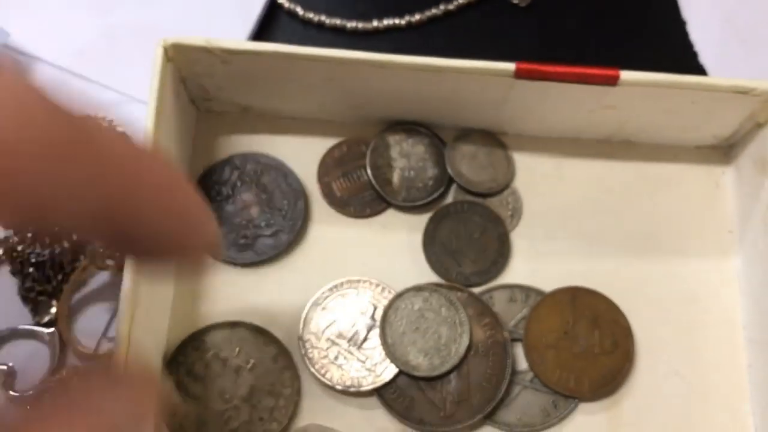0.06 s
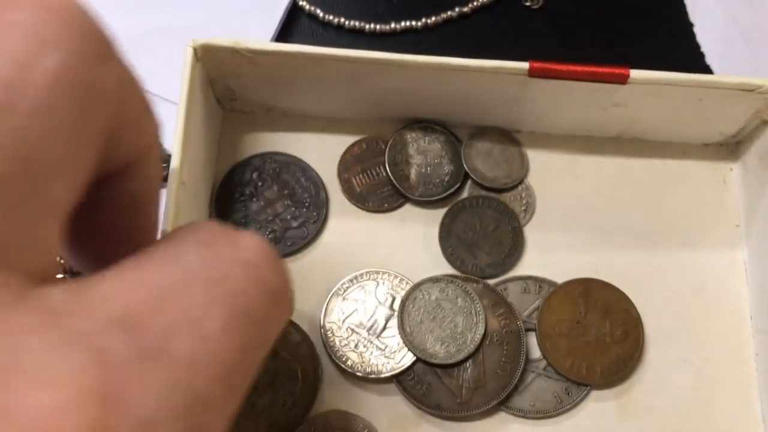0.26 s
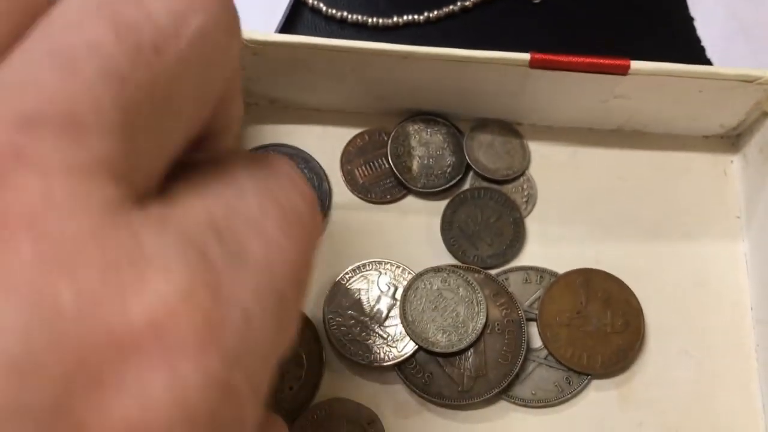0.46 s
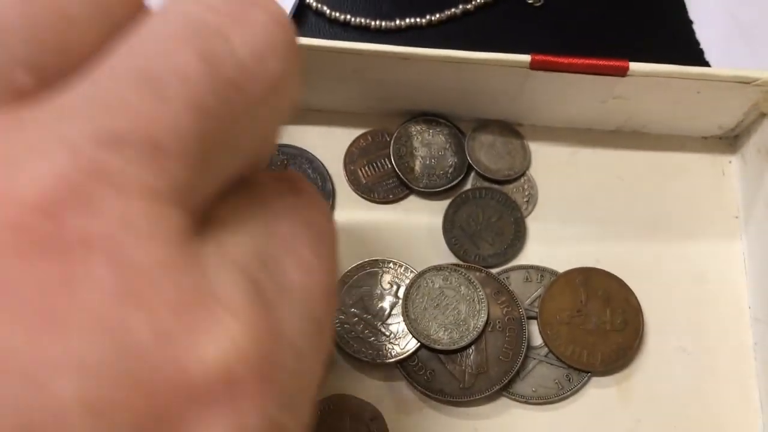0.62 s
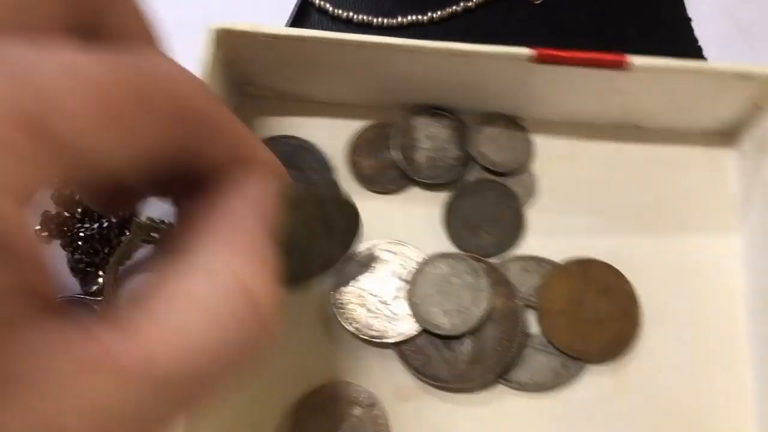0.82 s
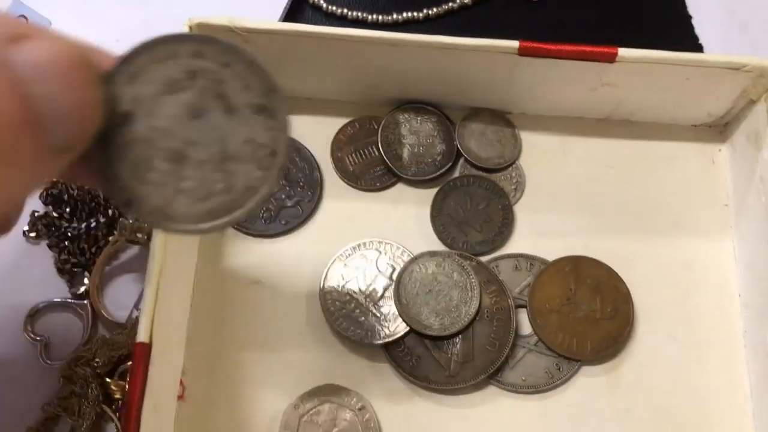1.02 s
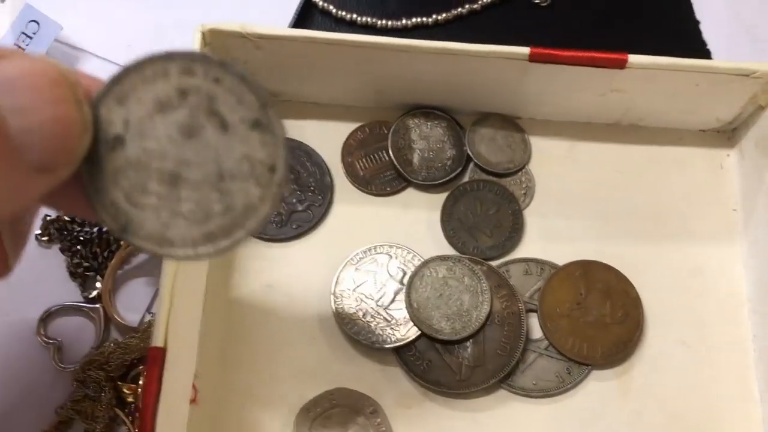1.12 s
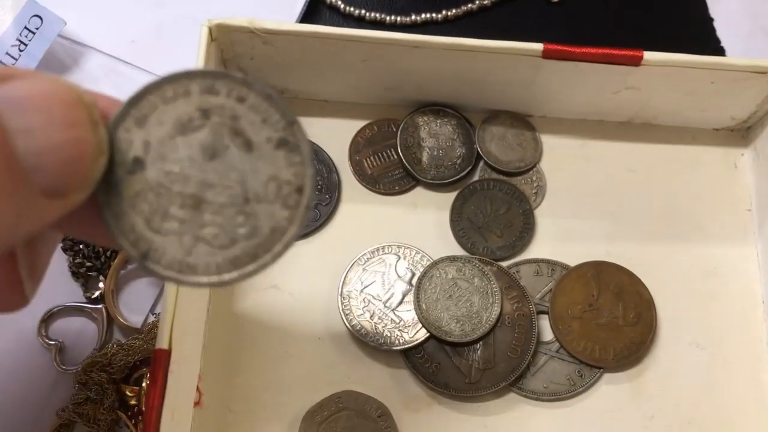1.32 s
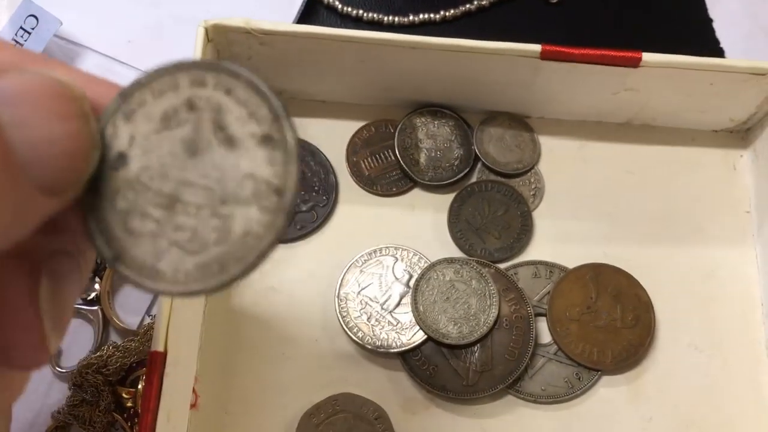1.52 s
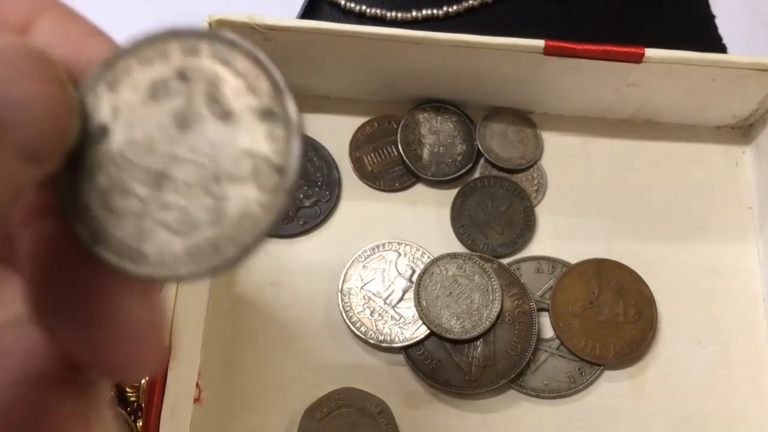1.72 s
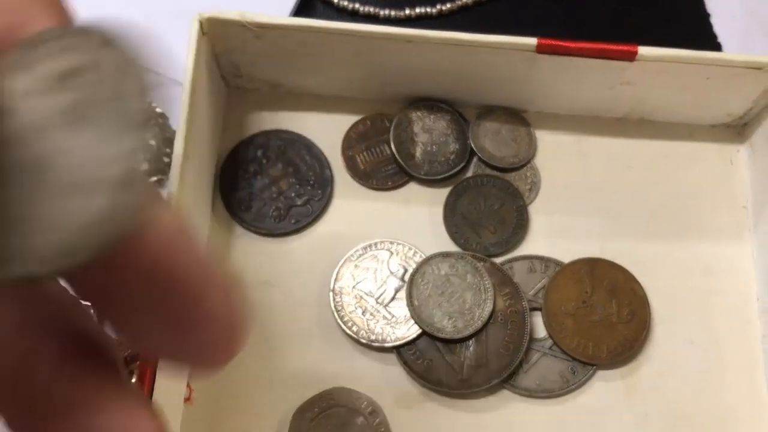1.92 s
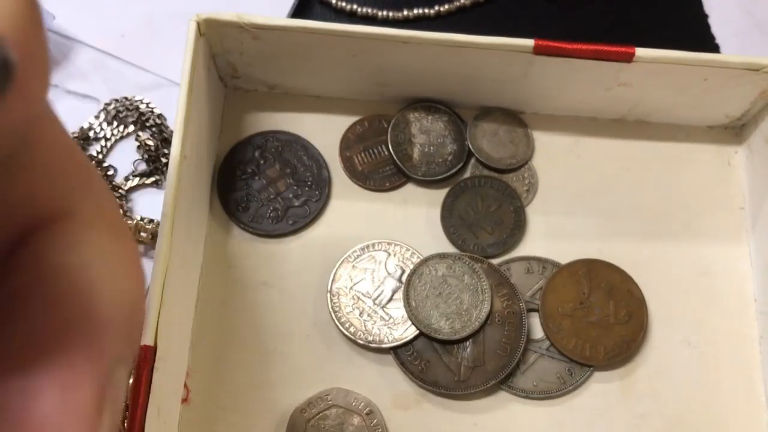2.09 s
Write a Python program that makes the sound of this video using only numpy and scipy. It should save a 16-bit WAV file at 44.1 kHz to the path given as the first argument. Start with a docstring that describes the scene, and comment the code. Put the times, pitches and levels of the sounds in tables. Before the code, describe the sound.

Close up, a coin stutters and scrapes harshly along hollow card, pauses, gives a loud knock with a soft thud and finger rustle, then a few light coin clicks before near silence with low hum.

```python
"""A coin dragged in jerks by a fingertip over the floor of a small cardboard box, close to the microphone:
each jerk shakes noisy catches through the card's resonances and hisses. Contacts are short decaying tones
and noise as the coin bumps the wall and, picked out, clicks against other coins. Low thuds of the box and a
rustle of skin lie beneath. Around it a quiet room: a short dull tail, patchy air, faint mains overtones
and a wavering low hum. The loudest knocks clip."""
import sys
import numpy as np
from scipy import signal
from scipy.fft import rfft, irfft, next_fast_len
from scipy.io import wavfile
from scipy.ndimage import uniform_filter1d

SR = 44100
rng = np.random.default_rng(int(sys.argv[2]) if len(sys.argv) > 2 else 0)


def dump(signal):
    """Clip the signal to [-1, 1] and save it as 16-bit WAV at the path in sys.argv[1]."""
    limited = np.clip(np.atleast_2d(signal).T, -1, 1)
    pcm = np.round(limited * 32767).astype(np.int16)
    wavfile.write(sys.argv[1], SR, pcm)


N = 94947


def amp(db):
    """dB to gain."""
    return 10 ** (np.asarray(db) / 20)


def unit(x):
    """Scaled to rms 1."""
    return x / np.sqrt(np.mean(x ** 2) + 1e-20)


def curves(rows):
    """One value per sample for each column after the time; the first column is silent outside its times."""
    times, first, *rest = np.transpose(rows)
    t = np.arange(N) / SR
    level = np.interp(t, times, first, -120, -120)
    return [level] + [np.interp(t, times, column) for column in rest]


def filtered(x, response):
    """x times a complex response of frequency, padded so that ringing does not wrap round."""
    m = next_fast_len(N + SR // 2)
    return irfft(rfft(x, m) * response(np.fft.rfftfreq(m, 1 / SR)), m)[:N]


def coloured(x, spectrum):
    """x through (frequency, level) points joined on a log axis, rms 1."""
    f, db = np.transpose(spectrum)
    return unit(filtered(x, lambda hz: amp(np.interp(np.log(hz + 1), np.log(f + 1), db, -120))))


def grains(per_s, spread_db):
    """Tiny catches at random times and of uneven size."""
    hit = rng.random(N) < per_s / SR
    size = amp(spread_db * np.minimum(rng.exponential(size=N), 3))
    return unit(hit * rng.standard_normal(N) * size)


# Resonances of the cardboard floor under the coin, before the bass cut:
# (frequency [Hz], width [Hz], level [dB])
CARD_MODES = [(1129, 160, 6), (1358, 134, 6), (1540, 130, 3.5), (2440, 96, 0.5), (2587, 74, -3),
              (3220, 480, -3.5), (4520, 310, -14)]


def card(hz):
    """Resonances of the box floor, alternating in sign; the small panel radiates little bass."""
    modes = 0
    for k, (centre, width, db) in enumerate(CARD_MODES):
        resonance = 1j * hz * width / (centre ** 2 - hz ** 2 + 1j * hz * width)
        modes = modes + (-1) ** k * amp(db) * resonance
    bass_cut = (1j * hz / (450 + 1j * hz)) ** 2
    return modes * bass_cut


# The coin slips forward in the box, close by: (time [s], level [dB], treble over that level [dB])
JERKS = [(.001, -7.5, -6.5), (0.013, -14, -16.5), (0.019, 4.5, -12.5), (0.03, -15, -6.5),
         (0.049, -12, -18.5), (0.062, -7.5, -17), (0.072, -4, -14), (0.083, -9.5, -11), (0.092, -4.5, -15),
         (0.107, -5.5, -20), (0.122, -7, -10), (0.134, 2.5, -16.5), (0.143, -11, -13.5), (0.156, -17, -6.5),
         (0.173, 2.5, -20), (0.181, 4.5, -10.5), (0.194, -15.5, -15.5), (0.207, -9, -14.5),
         (0.214, 0.5, -15), (0.223, -3.5, -11.5), (0.234, -2.5, -13), (0.244, -4, -15),
         (0.254, -3.5, -13.5), (0.266, 0, -13.5), (0.288, -1, -13), (0.296, -6, -15), (0.308, -3.5, -15.5),
         (0.316, -11, -9), (0.326, 2, -15), (0.35, -9, -10), (0.416, -25, -15), (0.889, -13.5, -12)]
# Hiss of friction, also heard in the rustle: (frequency [Hz], relative level per Hz [dB])
FRICTION_HISS = [(3500, -24.5), (4500, -5.5), (7600, -6), (8400, -4), (10000, -12), (15800, -11.5)]
JERK_RISE_S, JERK_T60_S = 0.0032, 0.05


def drag():
    """In each jerk the coin's rim catches on the card fibres, rings the box floor and hisses."""
    s, db, treble_db = np.transpose(JERKS)
    since = np.maximum(np.arange(N) / SR - s[:, None], 0)
    rise = 1 - np.exp(-since / JERK_RISE_S)
    shape = rise * amp(db[:, None] - 60 * since / JERK_T60_S)
    catches = grains(per_s=4000, spread_db=1.6)
    # scaled so that steady catches would leave the card at rms 1
    body = filtered(shape.sum(axis=0) * catches, card) / np.std(filtered(catches, card))
    hiss = coloured(catches + 2 * rng.standard_normal(N), FRICTION_HISS)
    return body + (amp(treble_db) @ shape) * hiss


# Single contacts in and above the box, before the gains below:
# (time [s], level [dB], knock pitch [Hz], metal over that level [dB], ring pitch of the coin struck [Hz])
CONTACTS = [(0.34, 1, 2330, -16.5, 9200), (0.347, 6, 2603, -15, 5520), (0.426, -30, 1250, -2.5, 6100),
            (0.508, -12, 3250, -28.5, 6700), (0.552, 10, 3003, -23, 8980), (0.5564, -2, 2000, -22, 7350),
            (0.5612, 2, 2840, -25, 4950), (0.5692, 2.5, 2410, -29.5, 8470), (0.579, -12, 3200, -30, 5270),
            (0.784, -8, 3190, -10, 6600), (0.8186, -6.5, 1740, -3, 6454), (0.8215, -4.5, 1552, -23.5, 5400),
            (0.8298, -5.5, 2370, -3.5, 6816), (0.867, -18.5, 3200, -7.5, 7600),
            (0.88, -19.5, 2520, -31.5, 6510), (0.905, -18, 2300, -15.5, 7200),
            (0.915, -18, 2530, -11, 5760), (0.936, -21, 2350, -12.5, 6500),
            (0.95, -10.5, 3290, -19.5, 6770), (0.974, -10.5, 3200, -9.5, 5310),
            (0.979, -12.5, 1113, -26.5, 5157), (0.986, -19.5, 3192, -11.5, 7915)]
# Modes of a damped coin, before a random change of level:
# (multiple of its ring pitch [ratio], level [dB], decay by 60 dB [s])
COIN_MODES = [(.8, -10, .005), (1, 0, .011), (1.37, -4, .014)]
KNOCK_T60_S, CRACK_T60_S = .01, .006
KNOCK_DB, CARD_DB, RING_DB, CRACK_DB = 1, 5, 7.5, -10  # added to a contact's columns
KNOCK_WAVER, RING_WAVER = .7, .45  # random phase drift, radians per root cycle


def contacts():
    """Each contact: a dull knock, a push on the card, a crack and the coin's short ring."""
    out, push = np.zeros(N + SR), np.zeros(N + SR)
    t = np.arange(SR // 10) / SR

    def fade(t60):
        """A quick onset and an exponential decay."""
        return amp(-60 * t / t60) * (1 - np.exp(-t / 0.00014))

    def tone(hz, waver):
        """A sine whose phase drifts at random."""
        return np.sin(2 * np.pi * hz * t + waver * np.sqrt(hz) * drift)

    for s, db, knock_hz, metal_db, ring_hz in CONTACTS:
        push_noise, crack_noise = rng.standard_normal((2, len(t)))
        chance = rng.standard_normal(len(COIN_MODES))
        drift = np.cumsum(crack_noise) / np.sqrt(SR)
        knock = fade(KNOCK_T60_S) * tone(knock_hz, KNOCK_WAVER)
        ring = 0
        for (multiple, mode_db, t60), luck in zip(COIN_MODES, chance):
            ring = ring + amp(mode_db + 2 * luck) * fade(t60) * tone(multiple * ring_hz, RING_WAVER)
        crack = fade(CRACK_T60_S) * np.convolve(crack_noise, [1, 1, -1, -1], 'same')
        metal = amp(metal_db) * (amp(RING_DB) * ring + amp(CRACK_DB) * crack)
        at = round(s * SR)
        out[at:at + len(t)] += amp(db) * (amp(KNOCK_DB) * knock + metal)
        push[at:at + len(t)] += amp(db + CARD_DB) * fade(CRACK_T60_S) * push_noise
    return out[:N] + filtered(push[:N], card)


# The whole box thuds: (time [s], level at the onset [dB], pitch [Hz], decay by 60 dB [s])
BUMPS = [(0.216, -27, 345.8, 0.62), (0.35, -28.5, 134.6, 0.36), (.509, -15, 362, 0.095),
         (0.554, -17.5, 203, 0.25), (0.965, -27.5, 169.6, 0.086)]


def bumps():
    """Soft low blows: decaying sines, the longer ones unsteadier in pitch."""
    s, db, hz, t60 = np.transpose(BUMPS)[..., None]
    since = np.maximum(np.arange(N) / SR - s, 0)
    steps = rng.standard_normal(since.shape) * (since > 0)
    drift = np.cumsum(steps, axis=1) * np.sqrt(hz / SR) * np.sqrt(t60)
    envelope = (1 - np.exp(-since / .001)) * amp(db - 60 * since / t60)
    return (envelope * np.sin(2 * np.pi * hz * since + 2.0 * drift)).sum(axis=0)


# Fingers shuffling among the coins, close by:
# (time [s], level [dB], treble over that level before the offset below [dB])
SHUFFLE = [(.355, -34, -3), (.4, -37.5, -3.5), (.52, -53.5, -8), (.551, -29.5, -1), (.556, -15.5, 13),
           (.575, -13, -5.5), (.59, -27.5, -10.5), (.635, -33.5, -11.5), (.69, -46, 5), (.81, -36, 1.5),
           (.92, -40, 6), (.96, -29.5, 2), (1.01, -36.5, 7), (1.035, -50.5, 7.5), (1.2, -63, 11)]
# Soft rub of skin: (frequency [Hz], relative level [dB])
SKIN_RUB = [(200, -1.5), (400, -2), (1080, -8), (2950, -4), (3180, 2), (3450, -6), (6000, -28)]
SHUFFLE_TREBLE_OFFSET_DB = -11.5


def shuffle():
    """Soft grainy rustle of skin and coins: noise and small catches in a dull and a bright band."""
    level_db, treble_db = curves(SHUFFLE)
    rustle = grains(per_s=4000, spread_db=1.4) + rng.standard_normal(N)
    treble = amp(treble_db + SHUFFLE_TREBLE_OFFSET_DB) * coloured(rustle, FRICTION_HISS)
    return amp(level_db) * (coloured(rustle, SKIN_RUB) + treble)


ROOM_DB, ROOM_T60_S = -24.5, .12


def room(x):
    """A short dull tail of decaying, smoothed noise, starting 4 ms behind the direct sound."""
    t = np.arange(SR // 3) / SR
    tail = uniform_filter1d(rng.standard_normal(len(t)), size=3) * amp(-60 * t / ROOM_T60_S) * (t > .004)
    return amp(ROOM_DB) * signal.fftconvolve(x, tail / np.linalg.norm(tail))[:N]


# Air of the quiet room: (frequency [Hz], relative level [dB])
AIR = [(15, -9), (70, -8.5), (92, -16.5), (300, -18.5), (480, -22.5), (1500, -30.5), (10500, -42),
       (12500, -38), (15900, -39.5)]
# Swells in the treble of the air: (time [s], level [dB])
SWELLS = [(1.5, -62.5), (1.628, -54), (1.882, -58), (2.08, -55)]
# The wavering low hum: (time [s], level [dB])
HUM = [(0, -42), (.44, -48), (.61, -38), (.98, -50.5), (1.1, -42), (1.17, -54.5), (1.37, -39), (1.52, -49),
       (1.72, -36.5), (1.87, -49.5), (2.0, -36.5), (2.15, -47)]
AIR_DB, AIR_PATCHY_DB = -46.5, 1.2
SWELL_S, SWELL_LOW_HZ = .03, 2000
MAINS_HZ, MAINS_ORDERS, MAINS_DB = 60, [3, 5, 8, 9], -63  # level of each faint overtone
HUM_HZ = 51


def room_air():
    """Noise whose level varies at random in broad patches of time and frequency."""
    z = signal.stft(rng.standard_normal(N), nperseg=512)[2]
    field = uniform_filter1d(rng.standard_normal(z.shape), size=40, axis=0)
    field = uniform_filter1d(field, size=16, axis=1)
    air = signal.istft(z * amp(AIR_PATCHY_DB * unit(field)), nperseg=512)[1][:N]
    return amp(AIR_DB) * coloured(air, AIR)


def treble_swells():
    """The treble of air noise under brief bell-shaped rises."""
    t = np.arange(N) / SR
    treble = unit(filtered(coloured(rng.standard_normal(N), AIR), lambda hz: hz > SWELL_LOW_HZ))
    return treble * sum(amp(db) * np.exp(-.5 * ((t - s) / SWELL_S) ** 2) for s, db in SWELLS)


def mains_overtones():
    """Faint multiples of the mains frequency, each wandering in phase."""
    t = np.arange(N) / SR
    wander = np.cumsum(rng.standard_normal((len(MAINS_ORDERS), N)), axis=1) * .02
    tones = np.sin(2 * np.pi * MAINS_HZ * np.outer(MAINS_ORDERS, t) + wander)
    return amp(MAINS_DB) * np.sqrt(2) * tones.sum(axis=0)


def low_hum():
    """A steady low sine that swells and fades."""
    hum_db, = curves(HUM)
    return amp(hum_db) * np.sqrt(2) * np.sin(2 * np.pi * HUM_HZ * np.arange(N) / SR)


def scene():
    """The coin and box near the microphone, their room tail and the background, in mono."""
    near = drag() + contacts() + bumps() + shuffle()
    background = room_air() + treble_swells() + mains_overtones() + low_hum()
    return (near + room(near) + background)[None]


CLIP_HARD = 4.5  # higher bends more sharply into full scale
TOP_HZ = 15795


def record(dry):
    """At the microphone the loudest knocks clip at full scale; nothing is kept above the band limit."""
    clipped = dry[0] / (1 + np.abs(dry[0]) ** CLIP_HARD) ** (1 / CLIP_HARD)
    return filtered(clipped, lambda hz: hz < TOP_HZ)[None]


dry = scene()
out = record(dry)
dump(out)
```